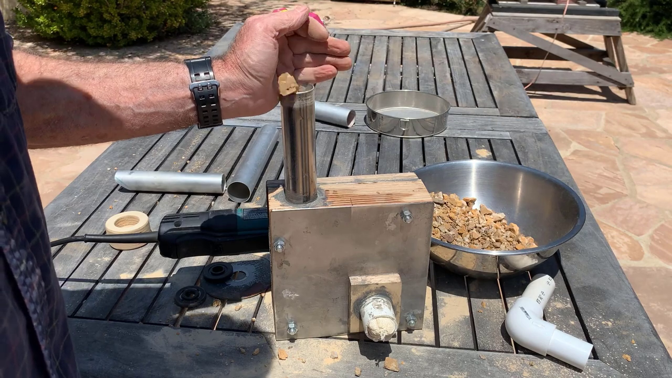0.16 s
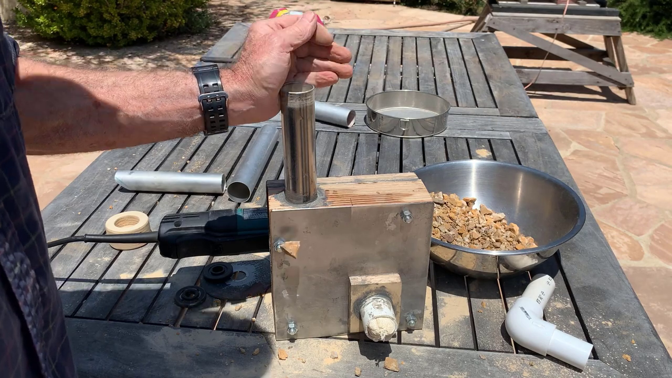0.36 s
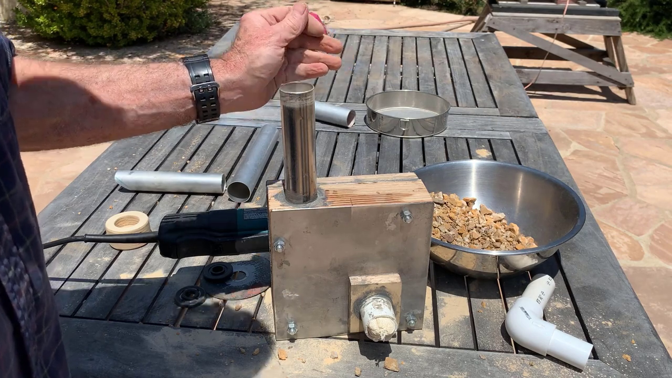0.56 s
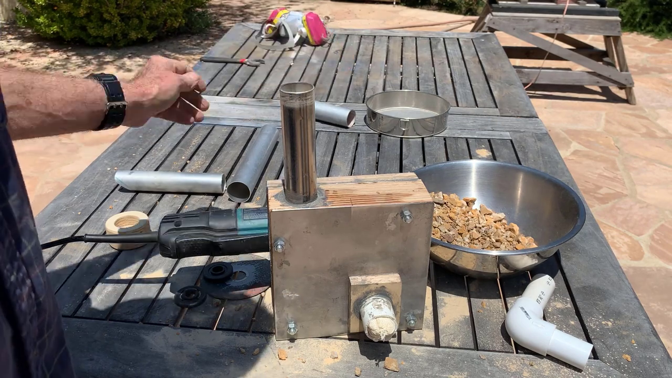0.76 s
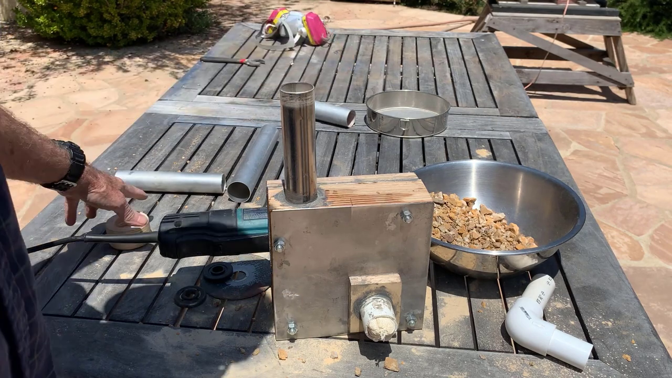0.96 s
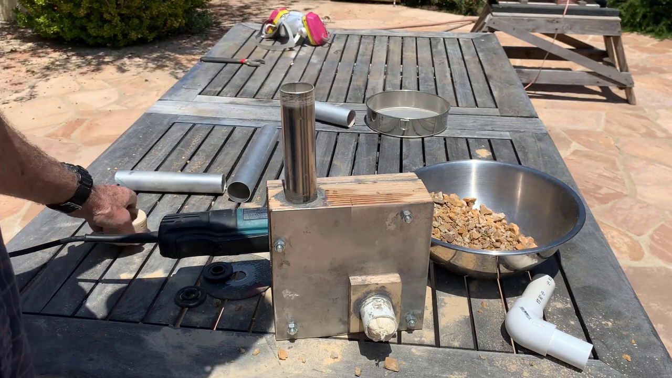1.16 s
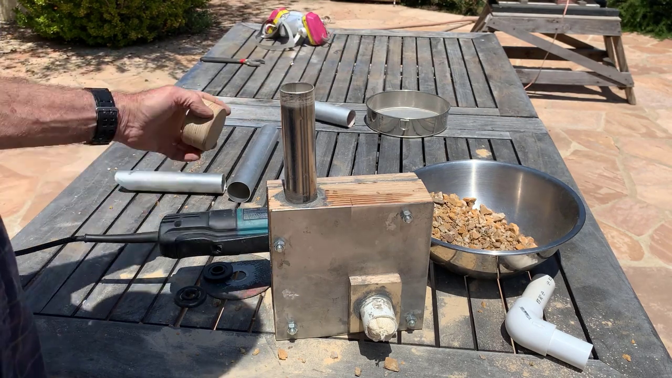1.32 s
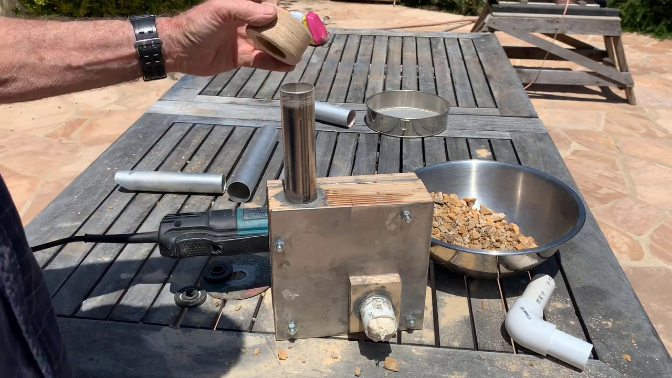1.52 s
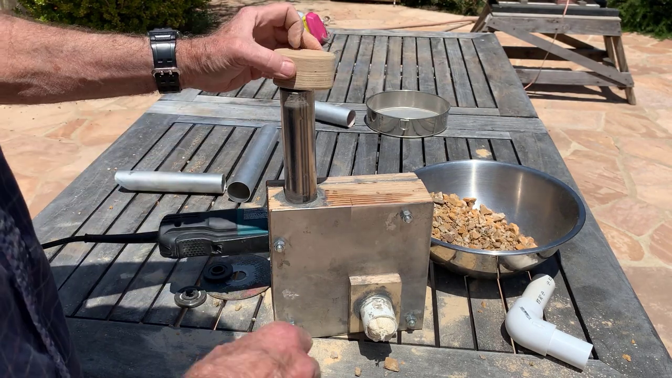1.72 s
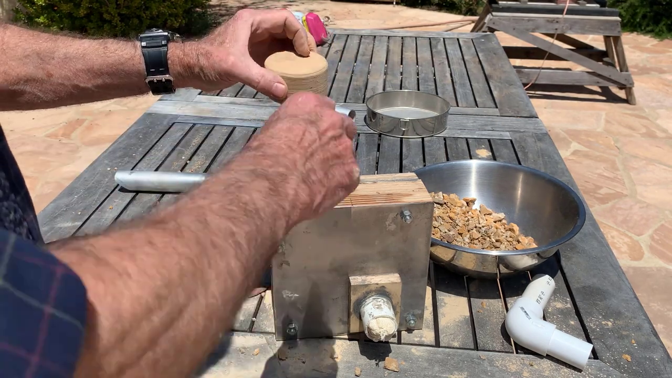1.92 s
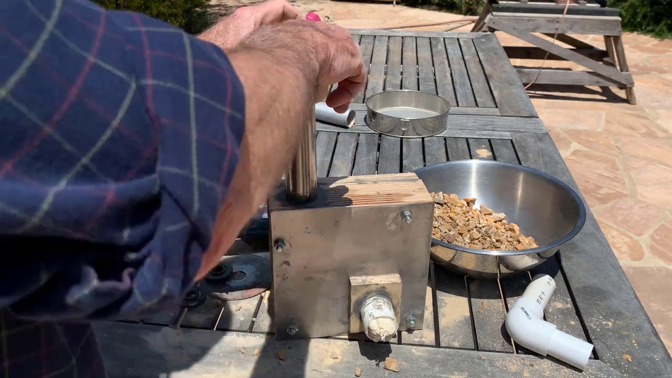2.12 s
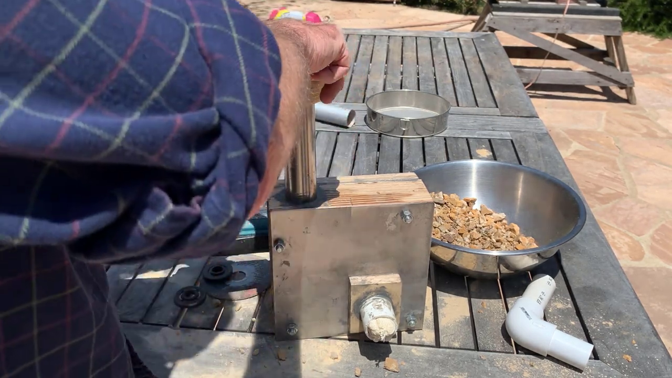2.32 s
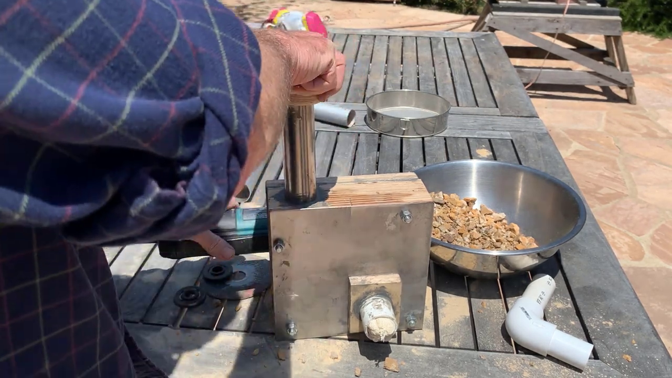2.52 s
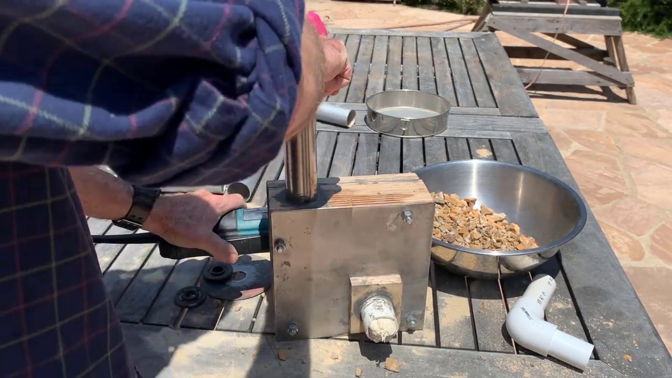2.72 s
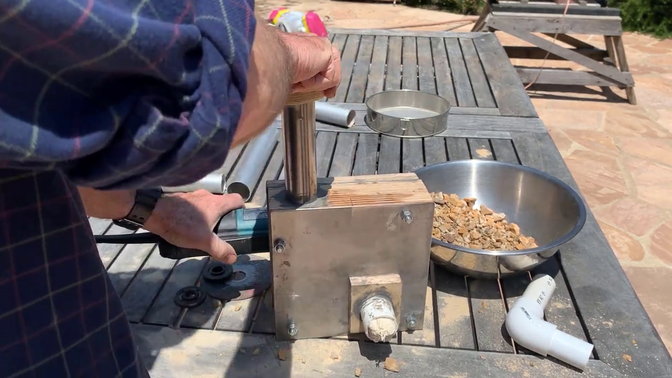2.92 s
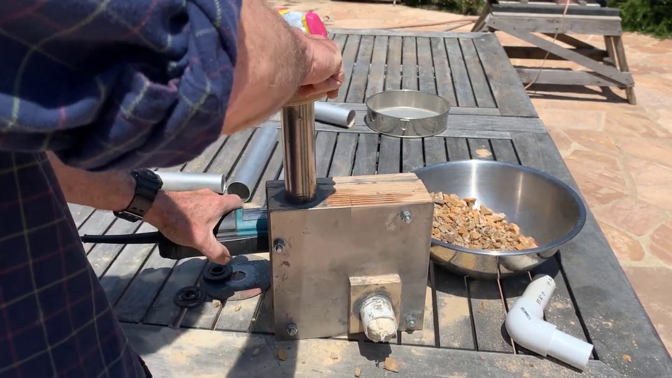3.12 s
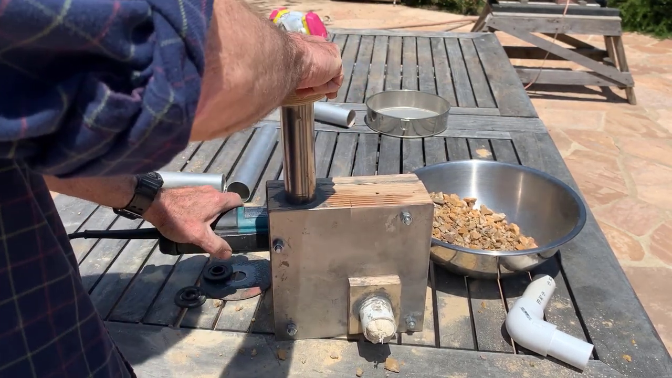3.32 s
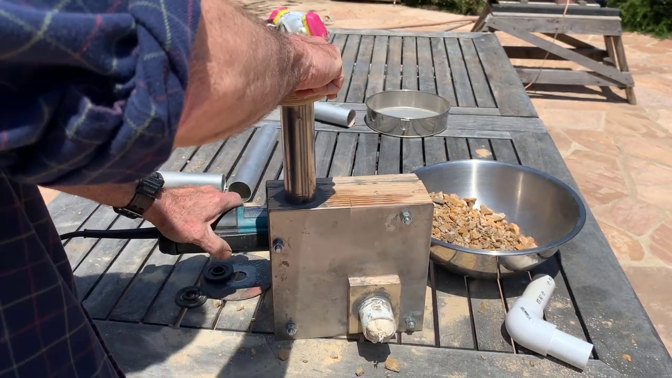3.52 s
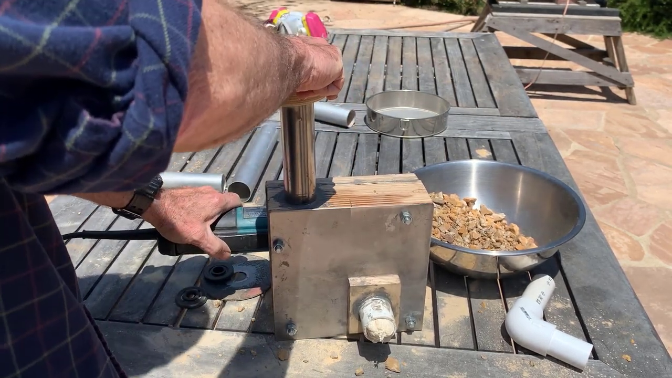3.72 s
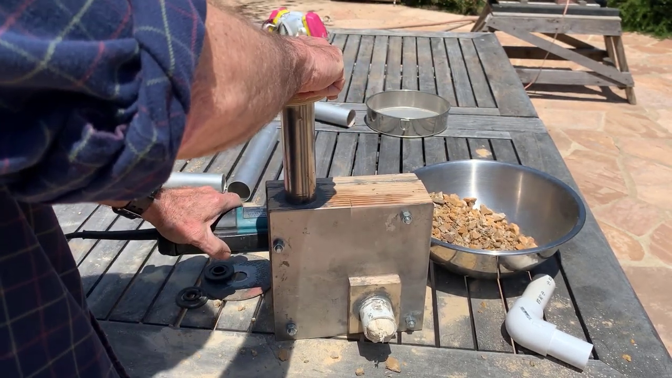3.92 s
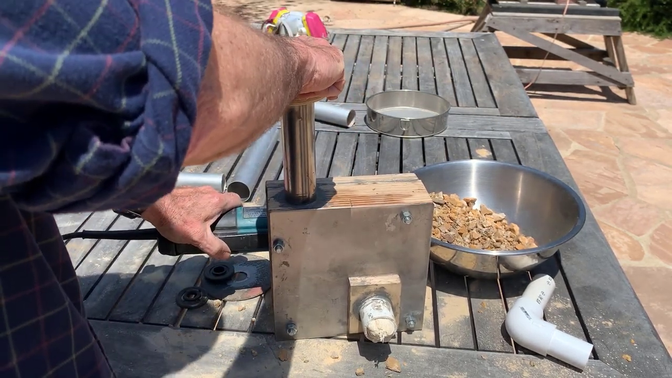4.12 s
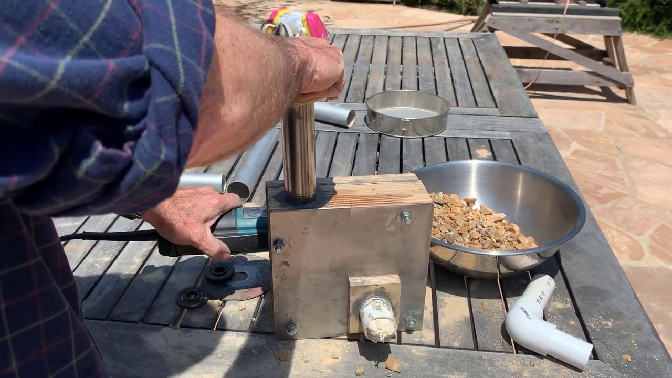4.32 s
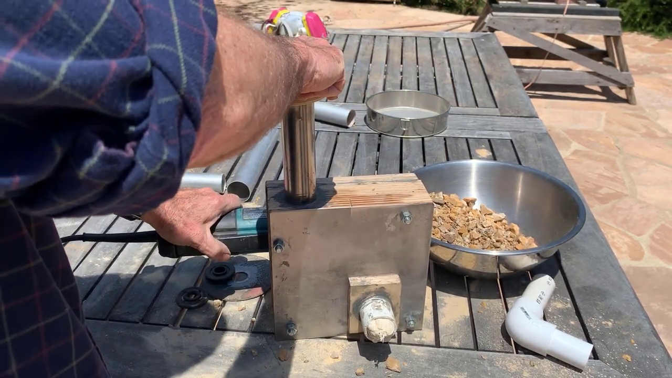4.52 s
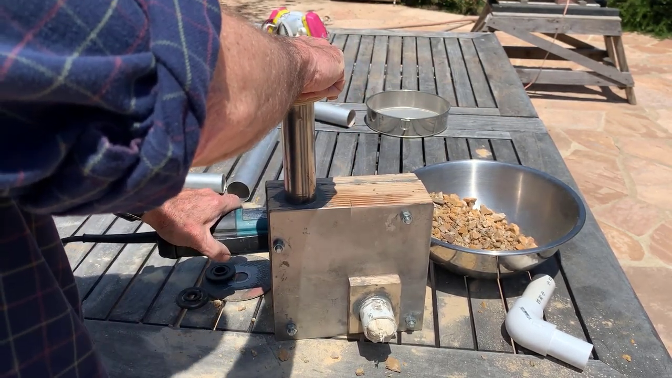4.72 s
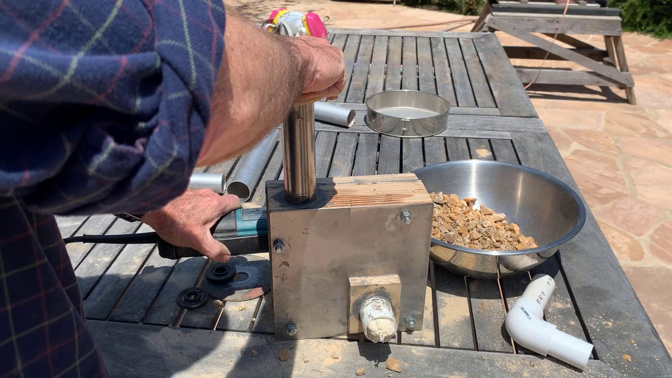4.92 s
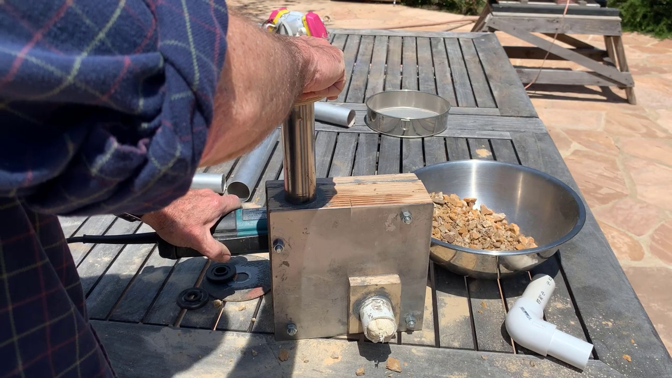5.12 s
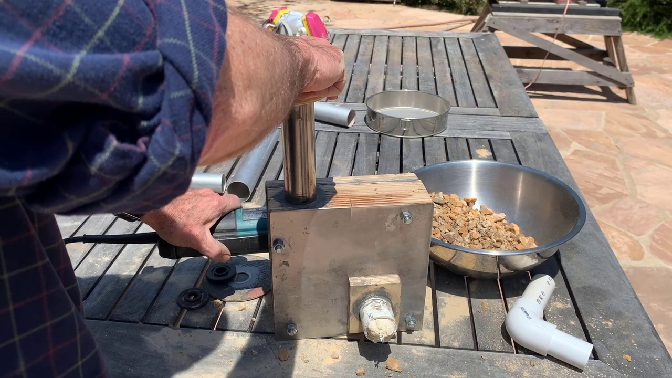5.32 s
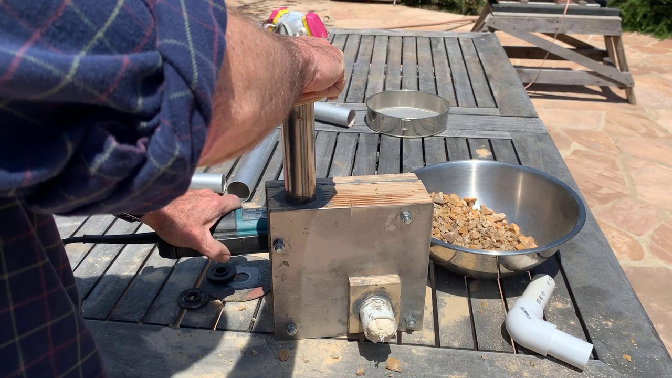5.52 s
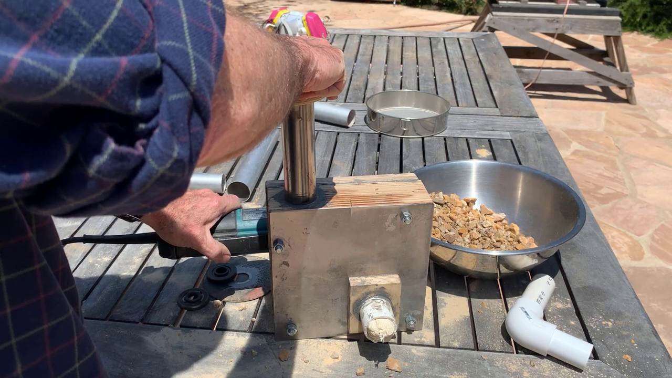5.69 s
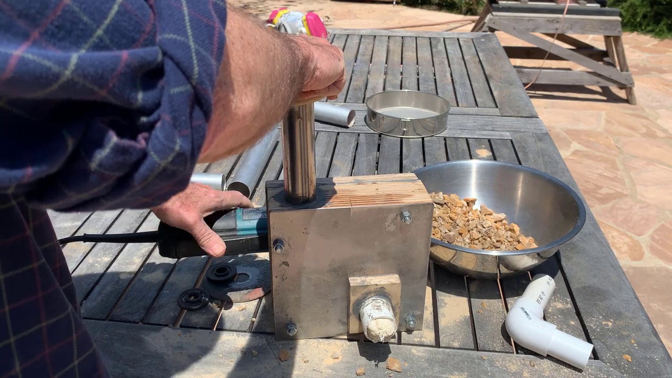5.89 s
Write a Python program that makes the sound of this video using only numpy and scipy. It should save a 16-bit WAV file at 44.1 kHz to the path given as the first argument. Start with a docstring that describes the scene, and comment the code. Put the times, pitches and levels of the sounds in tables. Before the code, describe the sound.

First half second: bright stone strikes and rattles in a steel tube, ending in a solid landing. Then near quiet with low open-air rumble, a finger click, light wooden taps and faint rubbing. At about 3.3 seconds a grinder starts under load: a dense burst of cracks and clangs, then sparser snaps, sizzling grit and a climbing gear whine, cut off at the very end. Close, dry, slight yard echo.

```python
"""An angle grinder drives a home-made stone crusher on a slatted table outdoors: gear, commutator, spindle
and fan tones follow the motor speed, and its whine climbs as the load turns to grit, until power-off near the end.
Under it the rotor cracks stones (coloured noise bursts) and flings gravel and grit (showers of small impacts).
Before that, stones slide and ring down the steel feed tube, and a wooden pusher is picked up and set in it.
Behind lie an outdoor rumble that sinks far down once the grinder runs, a far hum and a soft low-mid wash."""
import sys
import numpy as np
from scipy import signal
from scipy.fft import rfft, irfft
from scipy.io import wavfile

SR = 44100
rng = np.random.default_rng(int(sys.argv[2]) if len(sys.argv) > 2 else 0)


def dump_mix(stems):
    """Bounce the given channels to the path in sys.argv[1] as a 16-bit WAV at rate SR."""
    frames = np.atleast_2d(stems).T  # one column per channel
    limited = np.clip(frames, -1, 1)  # hard clip at full scale
    pcm = np.round(limited * 32767).astype(np.int16)
    wavfile.write(sys.argv[1], SR, pcm)


N = 262571
TIME = np.arange(N) / SR  # s

# Spectrum of stone against the steel tube. Each row: frequency in Hz, gain in dB.
STONE_SPECTRUM = [(200, -13), (900, -10), (1900, -6), (3000, -4.5), (6000, -5.5), (8000, -3), (10000, 2.5),
                  (12500, -7.5), (16000, -17)]
# Fingers fetching the pusher from the table. Each row: start in s, level above 5 kHz in dB, level below in dB.
FINGER_CLICKS = [(1.0054, -23, -27), (1.0658, -45, -44), (1.19, -42.5, -43), (1.238, -37.5, -48),
                 (1.268, -49, -46)]
# Spectrum of stone in the crushing chamber. Each row: frequency in Hz, gain in dB.
CHAMBER_SPECTRUM = [(30, -57), (70, -10), (130, -12), (330, -11), (500, -6.5), (780, -13.5), (1150, -8),
                    (1500, -6), (2200, -5.5), (3000, -8), (7000, -4), (8700, -4), (11700, 0), (13500, -8),
                    (15800, -8.5)]
# Motor speed before any coasting. Each row: time in s, armature turns per s.
MOTOR_SPEED = [(3.32, 110), (3.41, 196), (3.51, 203), (3.61, 202), (3.68, 209), (3.71, 224), (3.755, 235),
               (3.83, 231), (3.9, 224.5), (3.94, 227), (4.0, 243), (4.1, 259), (4.22, 262), (4.42, 295),
               (4.5, 310), (4.59, 311), (4.7, 329), (4.78, 331.5), (4.88, 331), (4.96, 340), (5.03, 341),
               (5.09, 336), (5.16, 339), (5.25, 346.7), (5.46, 353), (5.58, 352), (5.68, 356),
               (5.85, 359.6)]
POWER_ON, POWER_OFF = 3.3, 5.85  # s
PINION, CROWN = 10, 37  # teeth of the bevel gear, on armature and spindle
MAINS_HZ = 60
BITE_S = 0.23  # the gear teeth take up the load over this time


def amp(db):
    """Decibels to gain."""
    return 10 ** (np.asarray(db) / 20)


def unit(x):
    """Scales to rms 1."""
    return x / np.sqrt(np.mean(x ** 2) + 1e-20)


def noise():
    """White noise, independent in the two channels."""
    return rng.standard_normal((2, N))


def over_time(rows):
    """Each column of a table as a curve over all samples."""
    s, *columns = np.transpose(rows)
    return [np.interp(TIME, s, c) for c in columns]


def over_hz(rows, hz):
    """Each column of a table read on a log-frequency axis."""
    f, *columns = np.transpose(rows)
    return [np.interp(np.log(hz + 1), np.log(f + 1), c) for c in columns]


def add(mix, s, sound):
    """Mixes a sound in at time s."""
    part = mix[:, max(round(s * SR), 0):][:, :sound.shape[1]]
    part += sound[:, :part.shape[1]]


def envelope(start, attack, hold, release):
    """Straight rise, hold and fall, all in s."""
    return np.interp(TIME, start + np.cumsum([0, attack, hold, release]), [0, 1, 1, 0])


def since_power_on(rise_s):
    """Straight fade-in from the moment the power comes on."""
    return np.clip((TIME - POWER_ON) / rise_s, 0, 1)


def colour(x, points, size=4096):
    """Causal (minimum-phase) filter with the given spectrum."""
    hz = abs(np.fft.fftfreq(size, 1 / SR))
    log_gain = np.log(amp(over_hz(points, hz)[0]))
    spectrum = np.exp(np.conj(signal.hilbert(log_gain)))
    taps = np.fft.ifft(spectrum).real[:size // 2]
    return signal.oaconvolve(x, taps[None], axes=1)[:, :x.shape[1]]


def split(x, hz=5000):
    """The parts below and above a frequency."""
    filters = [signal.butter(N=4, Wn=hz, btype=kind, fs=SR, output="sos") for kind in ("low", "high")]
    return [signal.sosfilt(sos, x) for sos in filters]


def wander(rate_hz):
    """Random drift of rms 1: noise rolled off steeply above rate_hz."""
    rolloff = 1 + (np.fft.rfftfreq(N, 1 / SR) / rate_hz) ** 4
    return unit(irfft(rfft(rng.standard_normal(N)) / rolloff, N))


def resonate(x, hz, width):
    """A resonance of gain 1 at its peak, which follows the curve hz."""
    turn = np.exp(2j * np.pi * np.cumsum(hz * np.ones(N)) / SR)
    r = np.exp(-np.pi * width / SR)
    # shift the peak down to 0 Hz, smooth there, shift back
    return 2 * (turn * signal.lfilter([1 - r], [1, -r], x / turn + 1e-18)).real


def resonate_twice(x, hz, width):
    """The same resonance twice over, for steeper skirts."""
    return resonate(resonate(x, hz, width), hz, width)


def ring(modes, size=8192):
    """The dying sines of a struck body; modes hold Hz, dB and t60 in s."""
    t = np.arange(size) / SR
    return sum(amp(db - 60 * t / t60) * np.sin(2 * np.pi * hz * t) for hz, db, t60 in modes)


def blows(rows, points, t60, snap, rise, spike=0, size=6144, count=150):
    """Each blow is a contact spike, a snap and a dense, short ring, with its own treble and bass level."""
    out, t = np.zeros((2, N)), np.arange(size) / SR
    for (s, high_db, low_db), ring_s in zip(rows, t60 * np.ones(len(rows))):
        fall = amp(-60 * t / ring_s) + snap * np.exp(-t / 0.0013)
        force = rng.standard_normal((2, size)) * fall * (1 - np.exp(-(t / rise) ** 2))
        contact = (rise * SR * (.5 + rng.random(2))).astype(int)
        force[[0, 1], contact] += spike
        # each band is levelled by its first count samples
        for db, band in zip((low_db, high_db), split(colour(force, points))):
            add(out, s, amp(db) * band / band[:, :count].std(1, keepdims=True))
    return out


def shower(per_s, spread_db, decay):
    """Many small noise bursts at random times, a few much larger than the rest; decay in s."""
    size = amp(spread_db * np.minimum(rng.exponential(1, N), 4)) * (rng.random(N) < per_s / SR)
    power = signal.lfilter([1], [1, -np.exp(-1 / (decay * SR))], size ** 2)
    return np.sqrt(power) * rng.standard_normal((2, N))


def yard(x, t60, wet_db, dull_hz):
    """Adds scattered, dulled echoes from the table, paving and furniture."""
    t = np.arange(SR // 2) / SR
    sparse = rng.random((2, len(t))) < .1
    taps = rng.standard_normal((2, len(t))) * sparse * amp(-60 * t / t60) * (t > .003)
    lowpass = signal.butter(1, min(dull_hz, SR / 2 - 1), fs=SR)
    tail = signal.lfilter(*lowpass, taps / np.linalg.norm(taps[0]))
    return x + amp(wet_db) * signal.oaconvolve(x, tail, axes=1)[:, :N]


def outdoors(air_db=0):
    """Low rumble of the open air as coloured noise, with a faint far hum of drifting pitch and level."""
    # Spectrum of the open air. Each row: frequency in Hz, gain in dB.
    air_spectrum = [(20, -41), (40, -5.5), (70, 2), (115, -1.5), (200, -14), (290, -19), (500, -28),
                    (850, -29.5), (1500, -38.5), (4000, -41.5), (10000, -52), (12000, -60), (16000, -66)]
    # Level of rumble and hum together. Each row: time in s, level in dB.
    level = [(0, -34), (1.55, -36.5), (2.3, -35.5), (3.25, -37), (3.55, -47.5), (4.2, -64), (5.0, -66),
             (5.95, -46)]
    hum_hz, hum_db = 168.7, -10.5  # centre values, the level relative to the rumble
    air = unit(colour(noise(), air_spectrum, size=16384)) * amp(.5 * wander(18))
    hum_phase = 2 * np.pi * np.cumsum(hum_hz + wander(3.3)) / SR
    hum = amp(hum_db + 2 * wander(4.3)) * np.sin(hum_phase)
    return amp(over_time(level)[0] + air_db) * (air + hum)


def wash():
    """A soft low-mid wash of coloured noise that swells again as the pusher is fetched, then dies away."""
    # Spectrum of the wash. Each row: frequency in Hz, gain in dB.
    wash_spectrum = [(100, -33), (200, 1.5), (285, -1.5), (400, -4.5), (600, -17.5), (900, -13),
                     (1600, -23.5), (5000, -64), (16000, -74)]
    # Its level. Each row: time in s, level in dB.
    level = [(0, -42), (.4, -45.5), (.9, -49), (1.15, -44), (1.45, -55.5), (3.2, -69), (3.6, -75)]
    return amp(over_time(level)[0]) * unit(colour(noise(), wash_spectrum))


def table_bump(db=-27, hz=75, t60=0.21):
    """The hand grabbing the pusher gives the table top one low bump, a dying sine."""
    t = np.maximum(TIME - FINGER_CLICKS[0][0], 0)
    return amp(db - 60 * t / t60) * np.sin(2 * np.pi * hz * t) * np.ones((2, 1))


def clacks(level_db=-1):
    """Short double taps of wood, with faint echoes from the yard, as the pusher is lifted."""
    # Each row: start in s, level below 5 kHz in dB, level above in dB, both ahead of level_db.
    lifts = [(1.298, -35.5, -51), (1.334, -34, -52), (1.426, -37, -59), (1.458, -42.5, -68),
             (1.552, -40, -56), (1.5648, -45.5, -46), (1.697, -35.5, -52), (1.71, -39, -51)]
    # Spectrum of the wood. Each row: frequency in Hz, gain in dB.
    wood = [(60, -45), (200, -23), (1700, -15), (2150, 0), (2650, 1.5), (3250, 5.5), (3850, -19),
            (4450, -3), (5000, -9.5), (7000, -5), (9500, 1), (12000, -4), (16000, -17)]
    rebound_s, rebound_db = 0.0054, -12  # the second tap, after and relative to the first
    pairs = [(s + k * rebound_s, high + k * rebound_db, low + k * rebound_db)
             for s, low, high in lifts for k in (0, 1)]
    taps = blows(pairs, wood, t60=0.024, snap=0.7, rise=0.0005)
    return amp(level_db) * yard(taps, t60=0.17, wet_db=-8, dull_hz=6000)


def rubs(hiss_db=-3):
    """Pusher and hand rub: strokes of grainy friction, quick to rise, slower to fall, each with one resonance."""
    # The pusher rubs in the tube and the hand slides to the switch. Each row: start in s, level in dB,
    # fall in s, resonance in Hz, its width in Hz, its strength in dB.
    strokes = [(2.052, -64, 0.013, 900, 900, 4), (2.655, -51, 0.055, 1200, 790, 0),
               (2.88, -53, 0.052, 1500, 1000, -10), (3.086, -48, 0.054, 2230, 500, -13)]
    # Spectrum of the hiss. Each row: frequency in Hz, gain in dB.
    hiss_spectrum = [(200, -8), (800, 1), (2300, -7), (5000, -5), (9500, -6), (12000, -13), (16000, -34)]
    friction = shower(450, 1.5, 0.0021)
    hiss = amp(hiss_db) * unit(colour(friction, hiss_spectrum))
    out = np.zeros((2, N))
    for s, db, fall, hz, width, ring_db in strokes:
        tone = amp(ring_db) * unit(resonate_twice(friction, hz, width))
        out += amp(db) * envelope(s, 0.0035, 0.0079, fall) * (hiss + tone)
    return out


def handling(landing_db=0, thud_db=0, click_db=0):
    """A stone lands in the chamber; the wooden pusher is fetched and thuds into the tube."""
    # A stone landing in the chamber. Each row: start in s, level above 5 kHz in dB, level below in dB.
    landings = [(0.5292, -25.5, -13.5)]
    # Spectrum of the landing. Each row: frequency in Hz, gain in dB.
    landing_spectrum = [(120, -12), (300, -9), (520, 4), (900, 1), (1300, 3), (1900, 1.5), (3300, -1.5),
                        (5000, -17.5), (6800, -21), (7900, -4), (10500, -37), (14000, -26), (16000, -42)]
    # The pusher meeting the tube. Each row: start in s, level above 5 kHz in dB, level below in dB.
    pusher_thuds = [(1.7575, -62, -30)]
    # Spectrum of the thud. Each row: frequency in Hz, gain in dB.
    thud_spectrum = [(120, -32), (400, 1), (620, -3.5), (860, 14), (1100, -14), (1350, -1), (1750, -12),
                     (2400, -31), (5000, -28), (9000, -27), (16000, -45)]
    # Spectrum of the finger clicks. Each row: frequency in Hz, gain in dB.
    click_spectrum = [(200, -13), (500, -15), (800, 2), (1100, -6), (1700, -3.5), (2500, 0), (3000, -1),
                      (4500, 2), (6200, -3.5), (8500, 5), (10500, -3), (12000, -7), (16000, -14)]
    landing = blows(landings, landing_spectrum, t60=0.037, snap=1.5, rise=0.000695, spike=10.6)
    landing = yard(landing, t60=0.28, wet_db=-8.5, dull_hz=4880)
    thuds = blows(pusher_thuds, thud_spectrum, t60=0.027, snap=0.35, rise=0.00077, count=400)
    thuds = yard(thuds, t60=0.12, wet_db=-5.5, dull_hz=3000)
    clicks = blows(FINGER_CLICKS, click_spectrum, t60=0.026, snap=2.5, rise=0.0007, spike=11)
    near = yard(amp(click_db) * clicks + rubs(), t60=0.2, wet_db=-5, dull_hz=6040)
    return amp(landing_db) * landing + amp(thud_db) * thuds + clacks() + near


def rattles(count=3):
    """The evenly spaced, weakening taps of a stone rattling from wall to wall."""
    # Each row: start in s, level above 5 kHz in dB, level below in dB, gap between taps in s.
    bouts = [(0.261, -45, -51, 0.033), (0.4272, -36, -40.5, 0.019)]
    fade_db = -1  # from one tap to the next
    return [(s + k * gap, high + k * fade_db, low + k * fade_db)
            for s, high, low, gap in bouts for k in range(count)]


def sliding(grain_db=-9, squeak_db=-6, width_hz=310, squeak_width_hz=140, judder_db=-1.7):
    """A stone judders down the tube wall: its modes rise a little, then sink together; one squeaks briefly."""
    # Path of the slide. Each row: time in s, level in dB, main resonance in Hz.
    path = [(0, -30, 3900), (0.05, -37, 4220), (0.085, -37, 3980), (0.125, -39, 3740), (0.17, -50, 3540),
            (0.25, -50, 3200)]
    # Modes of the slide. Each row: ratio to the main resonance, gain in dB.
    slide_modes = [(.7, -11), (.8, -6), (.91, -1), (.98, 7), (1.08, 0), (1.22, -3), (1.32, -4),
                   (1.45, -7.5)]
    level_db, hz = over_time(path)
    friction = shower(1700, 0.88, 0.0007)
    strands = sum(amp(db) * resonate_twice(friction, hz * ratio, width_hz) for ratio, db in slide_modes)
    squeak = unit(resonate_twice(friction, hz, squeak_width_hz))
    squeak = squeak * envelope(start=0.096, attack=0.032, hold=0.046, release=.02)
    grain = unit(colour(friction, STONE_SPECTRUM))
    scrape = unit(strands) + amp(squeak_db) * squeak + amp(grain_db) * grain
    fade_out = np.interp(TIME, [.17, .3], [1, 0])
    return scrape * amp(level_db + judder_db * wander(120)) * fade_out


def feeding(ring_db=-22, stone_db=-2):
    """Stones slide and clatter down the tube, whose steel rings while the hand is off it."""
    # Stones striking the tube; the last row is the landed stone bouncing. Each row: start in s,
    # level above 5 kHz in dB, level below in dB, both ahead of stone_db.
    stones = [(0.0268, -26, -36.5), (0.1615, -26.5, -35), (0.188, -20, -28), (0.2114, -26, -25.5),
              (0.4045, -21, -22), (0.5474, -39, -31)]
    # Modes of the steel tube. Each row: frequency in Hz, relative level in dB, t60 in s.
    tube_modes = [(2126, -15, 0.27), (3130, -1, 0.59), (8613, -4, 0.083), (8790, 20.5, 0.042),
                  (10100, 10, 0.067), (10400, 15, 0.034)]
    # The air in the tube, which the hand does not damp. Each row: frequency in Hz, relative level in dB, t60 in s.
    air_modes = [(1490, 3.5, 0.083)]
    strikes = blows(stones, STONE_SPECTRUM, t60=0.032, snap=0.47, rise=0.00074, spike=4.2)
    taps = blows(rattles(), STONE_SPECTRUM, t60=0.063, snap=0.89, rise=0.00055)
    hits = amp(stone_db) * (strikes + taps)
    # how free of the hand the steel is
    free = 0.057 + envelope(start=0.203, attack=0.032, hold=0.14, release=0.037)
    free = free + 0.25 * envelope(start=.422, attack=0.0046, hold=0.026, release=0.018)
    steel = signal.oaconvolve(hits * free, ring(tube_modes, size=14700)[None] / 10, axes=1)[:, :N]
    air = signal.oaconvolve(hits, ring(air_modes)[None] / 10, axes=1)[:, :N]
    clatter = hits + amp(ring_db) * (steel + air) + sliding()
    return yard(clatter, t60=0.43, wet_db=-8.5, dull_hz=4770)


def motor():
    """Speed in turns per s, the load of stone slowing it (0-1), and whether power is on (0-1)."""
    no_load_speed = 342.6  # turns per s from which the load counts as nearly nil
    coast_per_s2 = 195  # turns per s lost each second once the power is cut
    driven = over_time(MOTOR_SPEED)[0]
    coasting = np.maximum(TIME - POWER_OFF, 0)
    load = np.clip(1 - driven / no_load_speed, .001, .48)
    return driven - coast_per_s2 * coasting, load, np.exp(-coasting / 0.0065)


def chamber(x):
    """The milling box adds its own resonances to whatever strikes it."""
    # Each row: frequency in Hz, width in Hz, gain in dB.
    modes = [(578, 91, -9.5), (723, 23, -8), (1426, 64, 0), (2035, 45, -10), (2230, 98, -5),
             (8390, 910, -0.5), (9800, 150, -5), (13550, 590, 3.5)]
    return x + sum(amp(db) * signal.lfilter(*signal.iirpeak(hz, hz / width, SR), x) for hz, width, db in modes)


def milling(gravel_db=-20, grit_db=-15.5, swirl_db=-36, dust_db=-38, surge_db=1):
    """Gravel and grit fly with each rotor swipe as the load demands; fine sand swirls harder with speed."""
    swipes, swipe_depth = 2, .5  # per spindle turn; share of the level
    speed, load, powered = motor()
    gravel = unit(chamber(split(colour(shower(750, 2.2, 0.0018), CHAMBER_SPECTRUM))[0]))
    grit = unit(chamber(split(colour(shower(1300, 4.3, 0.0026), CHAMBER_SPECTRUM))[1]))
    sand = unit(chamber(split(colour(shower(900, 1.8, 0.0034), CHAMBER_SPECTRUM))[0]))
    feed = load * amp(surge_db * wander(13.5))  # the stones reach the rotor unevenly
    spindle_turns = np.cumsum(speed * PINION / CROWN) / SR
    swipe = 1 + swipe_depth * np.cos(2 * np.pi * swipes * spindle_turns)
    swirl = (speed / speed.max()) ** 7 * (0.8 + 0.35 * powered)
    grit_level = np.hypot(amp(grit_db) * feed, amp(dust_db))  # dust stays when the feed is gone
    mill = gravel * amp(gravel_db) * feed + grit * grit_level + sand * amp(swirl_db) * swirl
    return swipe * mill * since_power_on(0.1) ** 2


def chips(per_s=28, db=-31):
    """Small pieces snap at random, more softly as the load falls."""
    snaps = unit(colour(shower(per_s, 0.82, 0.0021), CHAMBER_SPECTRUM))
    return amp(db) * snaps * motor()[1] * since_power_on(.1)


def knocks(rise=0.00082, detune=0.02):
    """Each heavy piece thumps the box and rings its plate, a little differently wherever it lands."""
    # Heavy pieces thrown against the housing. Each row: start in s, thump of the box in dB,
    # clang of its steel plate in dB.
    pieces = [(3.308, -28, -29), (3.338, -13, -8), (3.392, -19, -32), (3.538, -25, -22),
              (3.557, -14.5, -14), (3.5892, -17, -6), (3.614, -14.5, -25), (3.648, -34, -21),
              (3.667, -32, -16.5), (4.3312, -22.5, -11.5)]
    # Modes of the box. Each row: frequency in Hz, relative level in dB, t60 in s.
    box_modes = [(442, -15, .03), (516, 0, 0.038), (690, -20, 0.019)]
    # Modes of the steel plate. Each row: frequency in Hz, relative level in dB, t60 in s.
    plate_modes = [(1360, -8, 0.029), (1448, 2, 0.021), (1580, -6, 0.017)]
    out = np.zeros((2, N))
    shifts = 1 + detune * rng.uniform(-0.88, 1, len(pieces))
    for (s, thump_db, clang_db), shift in zip(pieces, shifts):
        thump = amp(thump_db) * ring([(hz * shift, db, t60) for hz, db, t60 in box_modes])
        clang = amp(clang_db) * ring([(hz * shift, db, t60) for hz, db, t60 in plate_modes])
        sound = thump + clang
        add(out, s, sound[None] * (1 - np.exp(-TIME[:len(sound)] / rise)))
    return out * [[1], [0]]  # only in the channel that both microphone ports share


def jolting(jolt_db=-17, tremble_db=-26):
    """The starting torque jolts the whole box against the table, and it trembles on briefly."""
    box_spectrum = [(40, -22), (130, -26), (250, -3.5), (350, -11.0), (520, -5.0), (900, -11.0),
                    (1800, -8.0), (4000, -19.5), (16000, -41)]  # Hz, dB
    box = unit(chamber(colour(noise(), box_spectrum)))
    jolt = amp(jolt_db) * envelope(POWER_ON, 0.018, 0.031, 0.011)
    tremble = amp(tremble_db) * envelope(POWER_ON, .012, 0.05, 0.099)
    return box * np.maximum(jolt, tremble)


def crushing(crack_db=-6.0):
    """After the switch click the rotor kicks, cracks the stones, and flings gravel and grit round the chamber."""
    # The grinder's switch clicks (first row), then the rotor cracks stones. Each row: start in s,
    # level above 5 kHz in dB, level below in dB, both ahead of crack_db and the chamber.
    click_and_cracks = [(3.298, -27, -35), (3.3075, -22, -35), (3.328, -5, -14), (3.339, -6.5, -15.5),
                        (3.365, -10.5, -13), (3.376, -11, -13), (3.3915, -10, -8), (3.408, -6.5, -21),
                        (3.4155, -18, -22), (3.4435, -18, -22), (3.463, -17, -33), (3.4965, -29, -27),
                        (3.538, -35, -22), (3.558, -14, -18), (3.569, -18, -23), (3.5885, -19, -12.5),
                        (3.6125, -9.5, -25), (3.628, -16, -34), (3.648, -35, -22), (3.666, -21, -17.5),
                        (3.685, -16, -21), (3.694, -8.5, -22), (3.737, -16, -35), (3.785, -12, -24),
                        (3.7935, -14, -40), (3.84, -27, -25), (3.874, -31, -17.5), (3.893, -25, -17.5),
                        (3.913, -26, -22), (3.9195, -15, -25), (3.9625, -29, -39), (3.9755, -9.5, -18.5),
                        (4.025, -21, -37), (4.066, -16, -35), (4.103, -16.5, -41), (4.132, -18, -32),
                        (4.194, -17, -21.5), (4.222, -17, -25), (4.257, -17, -44), (4.301, -21, -34),
                        (4.3315, -15.5, -12), (4.398, -21.5, -36), (4.462, -22, -22), (4.556, -17, -26.5),
                        (4.622, -21.5, -27.5), (4.748, -19, -29), (4.808, -24, -43), (4.833, -24, -31),
                        (4.86, -22, -29), (4.89, -26, -28), (4.9865, -22, -39), (5.057, -12.5, -20),
                        (5.116, -26, -24)]
    longest_t60, shortening = 0.052, 0.24  # s, exponent: the faster the rotor, the shorter the crack
    speeds = np.interp([row[0] for row in click_and_cracks], *np.transpose(MOTOR_SPEED))
    t60 = longest_t60 * (speeds.min() / speeds) ** shortening
    sharp = chamber(blows(click_and_cracks, CHAMBER_SPECTRUM, t60=t60, snap=1, rise=0.00062, spike=2.4))
    inside = milling() + chips() + jolting() + amp(crack_db) * sharp
    return yard(inside, t60=0.24, wet_db=-5.5, dull_hz=5660) + knocks()


def gear_rasp(idle_db=-53, load_db=-31, width_hz=480):
    """Loaded gear teeth chatter: a rough band that climbs with motor speed and fades as the load goes."""
    speed, load, _ = motor()
    chatter = unit(resonate_twice(shower(2100, 1.5, 0.00081), PINION * speed, width_hz))
    loaded = amp(load_db) * load * envelope(POWER_ON, BITE_S, 0.75, .12)
    return (amp(idle_db) * since_power_on(BITE_S) + loaded) * chatter


def gear_gain(mesh_hz, base_db=-57):
    """The gear tone swells as its mesh frequency sweeps through resonances of the housing."""
    # Each row: frequency in Hz, width in Hz, level added at the top in dB.
    housing = [(2058, 130, -35), (2236, 180, -35.5), (2760, 106, -43), (3105, 50, -43), (3410, 120, -49),
               (3560, 78, -43)]
    return amp(base_db) + sum(amp(db) / (1 + (2 * (mesh_hz - hz) / width) ** 2) for hz, width, db in housing)


def grinder(fan_db=-37, bars_db=-37.0, buzz_db=-45, fan_throb=0.22):
    """A mains motor with fan, commutator and bevel gear; its torque throbs twice in each mains cycle."""
    # Tones of the spindle. Each row: multiple of its turning rate, level at full speed in dB.
    spindle_orders = [(1, -54.5), (2, -62), (4, -55), (6, -51.5)]
    # Spectrum of the fan's air. Each row: frequency in Hz, gain in dB.
    fan_spectrum = [(40, -20), (130, -1), (290, 0), (550, 3.5), (780, -4), (980, 5.5), (1200, -10),
                    (1450, 2.5), (2300, -3.5), (2900, -4.5), (3300, -11), (3580, 3), (3850, 1),
                    (4800, -12.5), (7000, -10.5), (9200, -5), (15500, -13.5)]
    bars = 12  # commutator tone cycles per armature turn
    brush_hz, brush_width_hz = 4240, 630  # the commutator whine grows as it climbs into this resonance
    jitter, snatch = .0005, .008  # rms share of the speed; snatch is scaled by the lack of speed
    ripple_rad, throb, waver_db = .04, .85, 1.2
    speed, _, powered = motor()
    pace = speed / speed.max()
    # stones snatch at the slow, loaded rotor
    shake = jitter * wander(55) + snatch * (1 - pace) * wander(106.0)
    angle = 2 * np.pi * np.cumsum(speed * (1 + shake)) / SR
    throb_phase = 2 * np.pi * 2 * MAINS_HZ * TIME
    angle = angle + ripple_rad * np.sin(throb_phase)  # with the throb, favours the line just above each tone
    torque = np.cos(throb_phase) * powered * pace ** 4
    pulsing = 1 + throb * torque
    # the gear sings at the housing's resonances, the commutator near full speed; both waver
    gear_level = gear_gain(PINION * speed) * since_power_on(BITE_S) ** 6
    gear_level = gear_level * (0.38 + 0.73 * powered) * amp(waver_db * wander(25))
    gear = gear_level * np.sin(PINION * angle) * pulsing
    bars_level = amp(bars_db) * pace ** 4 * powered * amp(waver_db * wander(12))
    commutator = resonate_twice(bars_level * np.sin(bars * angle) * pulsing, brush_hz, brush_width_hz)
    # the brushes scrape a fuzzy band round their tone
    buzz = unit(resonate_twice(noise(), bars * speed, 420))
    buzz = amp(buzz_db) * buzz * pace ** 14 * powered * pulsing
    whine = np.sqrt(2) * (gear + commutator) + buzz
    spindle_angle = angle * PINION / CROWN
    hum = sum(amp(db) * np.sin(k * spindle_angle) for k, db in spindle_orders)
    hum = hum + amp(-73.0) * np.sin(angle)  # the armature's own turn
    fan = amp(fan_db) * unit(colour(noise(), fan_spectrum)) * (1 + fan_throb * torque)
    return since_power_on(0.083) * (whine + (fan + np.sqrt(2) * hum) * pace ** 2)


def scene():
    """All the sources together."""
    background = outdoors() + wash()
    preparing = table_bump() + handling() + feeding()
    return background + preparing + crushing() + gear_rasp() + grinder()


def record(dry):
    """Two microphone ports, partly alike and shifted in phase; then the band limit."""
    # Each row: frequency in Hz, likeness 0-1, phase by which left leads in radians, left minus right in dB.
    ports = [(50, 0.67, 0, 1.5), (300, 1, 0.45, -.5), (600, 0.88, 0.72, -0.2), (1170, 0.85, 1.03, -0.2),
             (2200, 0.8, 0.26, -1.5), (3140, 0.24, 2.1, -1), (4800, 0.18, 2.5, -3), (7460, 1, 2, 0),
             (9050, 0.95, 0.5, 0.5), (12310, 1, -4, 0), (15800, 0.64, -8.5, 1)]
    edge_hz = 16000
    a, b = rfft(dry)
    alike, phase, balance_db = over_hz(ports, np.fft.rfftfreq(N, 1 / SR))
    alike = np.clip(alike, 0, 1)
    left = a * np.exp(1j * phase) * amp(balance_db / 2)
    right = (alike * a + np.sqrt(1 - alike ** 2) * b) / amp(balance_db / 2)
    pair = np.clip(irfft(np.array([left, right]), N), -1, 1)
    lowpass = signal.firwin(401, edge_hz, window=("kaiser", 8), fs=SR)
    return signal.oaconvolve(pair, lowpass[None], "same")


dry = scene()
out = record(dry)
dump_mix(out)
```